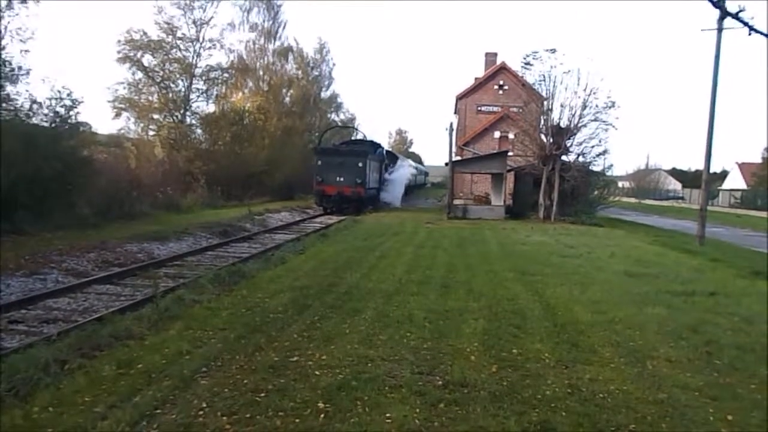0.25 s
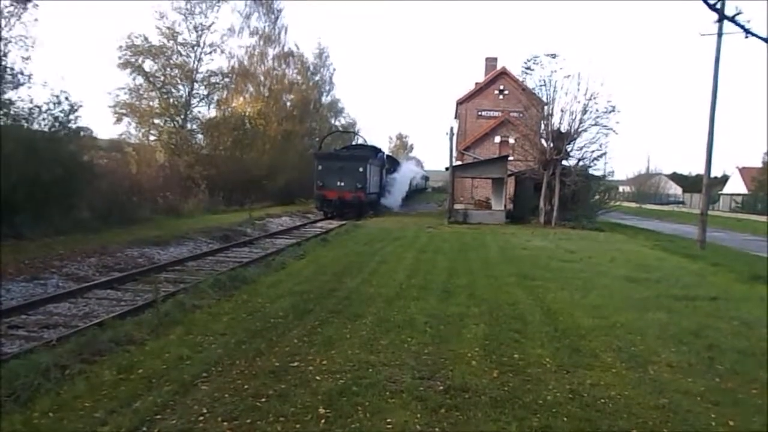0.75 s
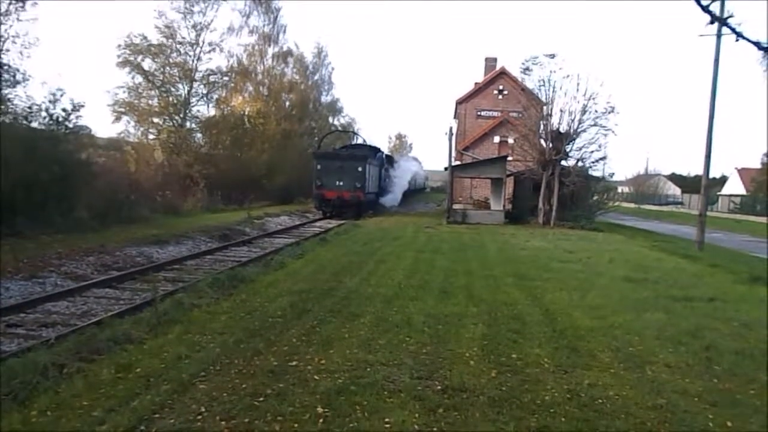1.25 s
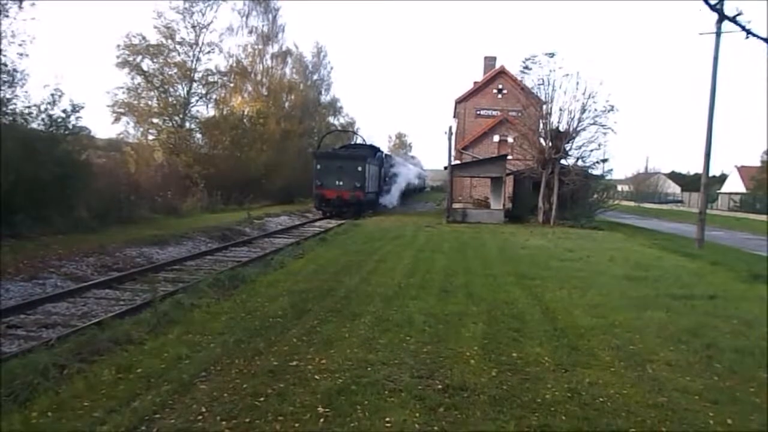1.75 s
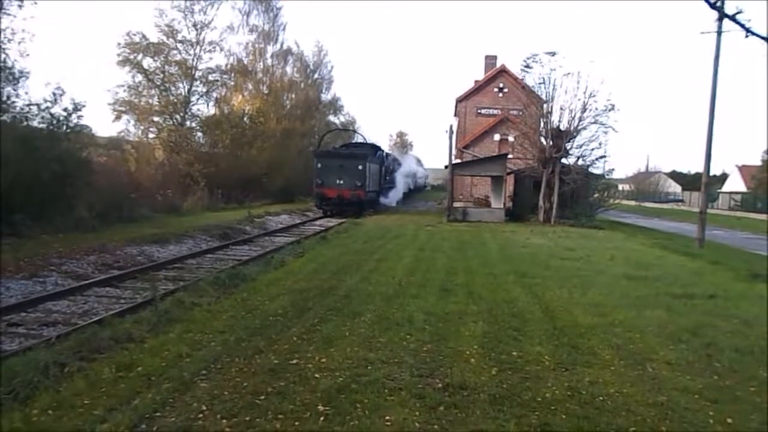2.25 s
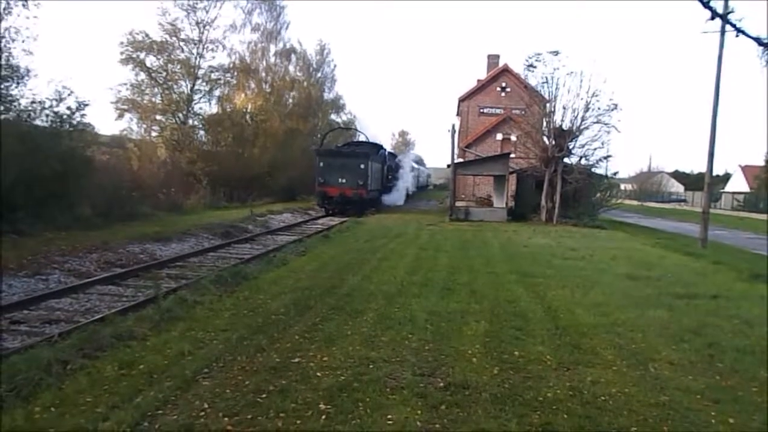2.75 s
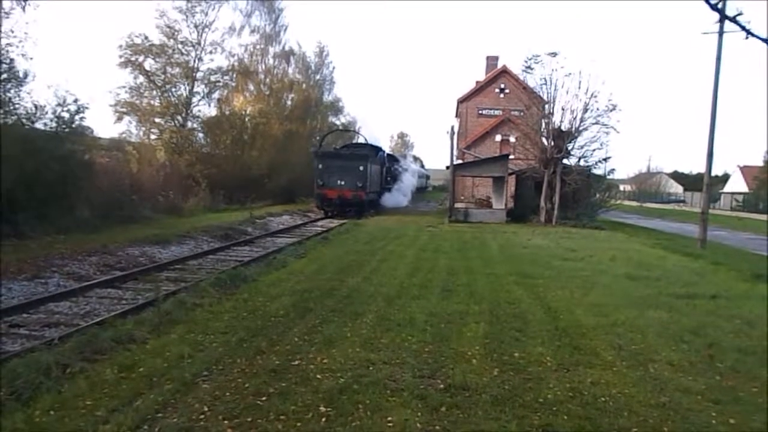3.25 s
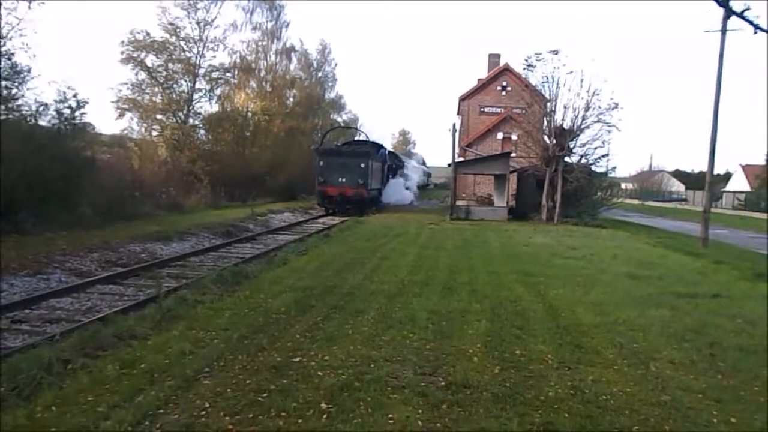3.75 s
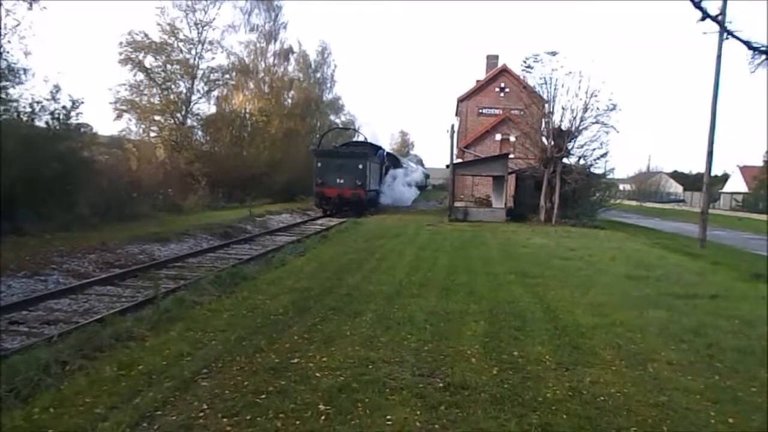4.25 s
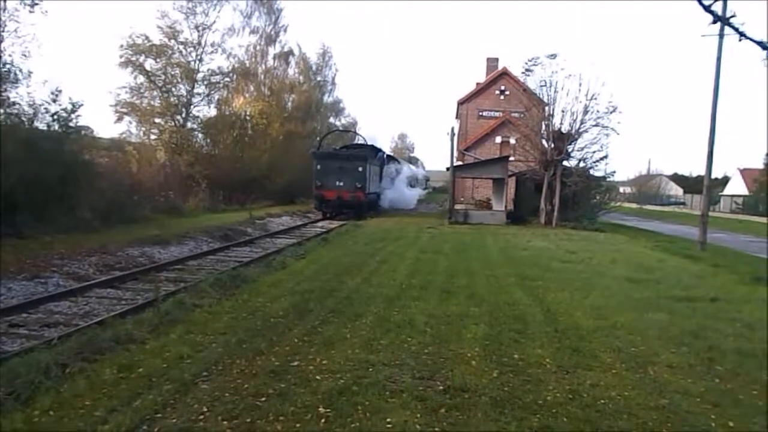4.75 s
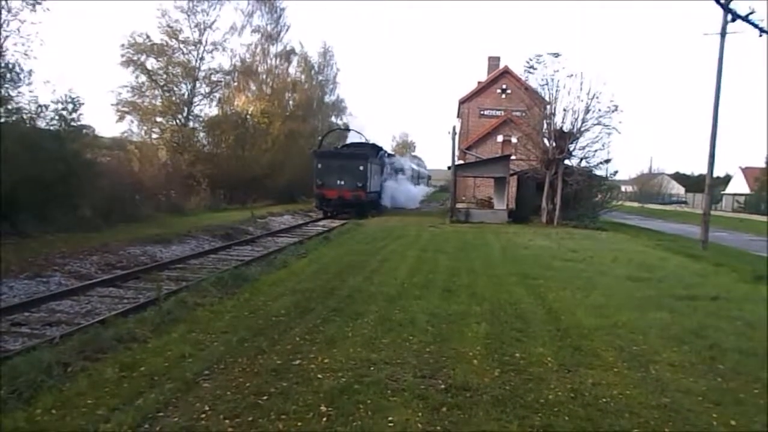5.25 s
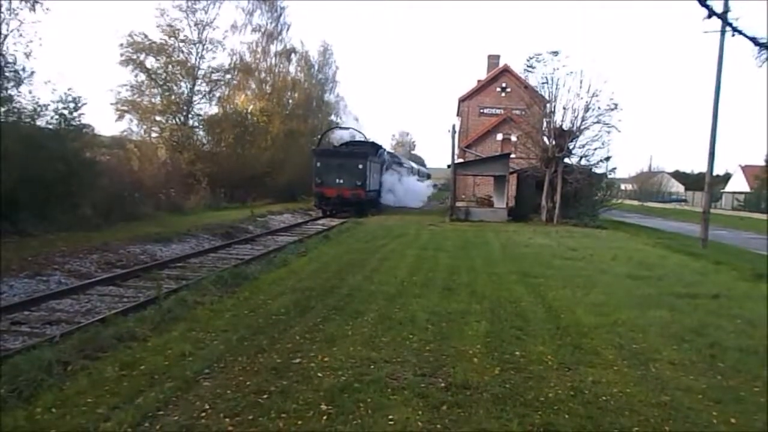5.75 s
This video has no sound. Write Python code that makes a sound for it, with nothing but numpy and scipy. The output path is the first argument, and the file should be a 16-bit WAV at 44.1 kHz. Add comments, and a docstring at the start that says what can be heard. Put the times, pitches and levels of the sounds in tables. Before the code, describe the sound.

Steam blows steadily from a distant stationary engine: patchy, fizzy noise, a smoother breathy roar and thin, fuzzy whistling tones. A few isolated soft wind bumps come early; then clusters of low flapping buffets dominate the foreground, with short lulls. The jet grows stronger through the middle and stays fairly full. A single handheld-type microphone in open air, identical on both sides, slightly dull on top, overloads in the strongest gust near five seconds.

```python
"""A steam locomotive stands across a lawn and blows off steam while wind strikes the single microphone.
From the start: a bright jet hiss (patchy coloured noise at the level of the steam pressure), a duller roar that
swings less, and fuzzy whistles from valves and pipes (noise in narrow resonances). The jet swells until about 4 s.
Gusts, faint at first and dense from about 2 s, bring low turbulence and short thumps; the strongest comes near 5 s.
A limiter ducks the level just after high peaks, and a treble filter leaves narrow gaps."""
import sys
import numpy as np
from scipy import signal
from scipy.fft import rfft, irfft, next_fast_len
from scipy.io import wavfile
from scipy.ndimage import uniform_filter1d, minimum_filter1d, map_coordinates

SR = 44100
rng = np.random.default_rng(int(sys.argv[2]) if len(sys.argv) > 2 else 0)


def output_pcm(signal):
    """Save a mono or channel-first signal as 16-bit PCM at the path in sys.argv[1].

    Samples are clipped to [-1, 1] before scaling.
    """
    pcm = np.clip(np.atleast_2d(signal).T, -1, 1) * 32767
    wavfile.write(sys.argv[1], SR, np.round(pcm).astype(np.int16))


N = 265217


def amp(db):
    """Gain of a level in dB."""
    return 10 ** (np.asarray(db) / 20)


def unit(x):
    """x at rms 1."""
    return x / np.sqrt(np.mean(x ** 2) + 1e-20)


def along(points, hz):
    """(frequency [Hz], value) points interpolated on a log frequency axis."""
    point_hz, values = np.transpose(points)
    return np.interp(np.log(hz + 1), np.log(point_hz + 1), values)


def wobble(knots_per_s):
    """Smooth random curve: a spline through normal random knots."""
    knots = rng.standard_normal(int(N * knots_per_s / SR) + 4)
    return map_coordinates(knots, [np.arange(N) * knots_per_s / SR])


def filtered(x, response):
    """x times a response of frequency in Hz, zero-padded against wrap-around."""
    size = next_fast_len(N + SR // 2)
    spectrum = rfft(x, size) * response(np.fft.rfftfreq(size, 1 / SR))
    return irfft(spectrum, size)[..., :N]


def rush(spectrum, patchy_db):
    """Turbulent flow: coloured noise of rms 1 with patches of random gain in time and frequency."""
    z = signal.stft(rng.standard_normal(N + 512), nperseg=512)[2]
    field = uniform_filter1d(rng.standard_normal(z.shape), size=7, axis=0)  # bins
    field = uniform_filter1d(field, size=8, axis=1)  # frames
    noise = signal.istft(z * amp(patchy_db * unit(field)), nperseg=512)[1][:N]
    return unit(filtered(noise, lambda hz: amp(along(spectrum, hz))))


def steam():
    """Escaping steam: the jet follows the pressure, flutters, swells and dips; the roar is smoother."""
    # jet colour: (frequency [Hz], relative level [dB per Hz])
    jet_spectrum = [(600, -68), (1500, -19.5), (2500, -6.5), (3600, -7), (4500, -3), (5200, -1),
                    (6200, -4.5), (7700, -11), (9300, -12.5), (10600, -9.5), (11300, -26)]
    # roar colour: (frequency [Hz], relative level [dB per Hz])
    roar_spectrum = [(40, 8), (120, -1.5), (300, -11), (520, 2), (700, -3), (900, -3), (1200, -2.5),
                     (1700, -0.5), (2600, -4), (4500, -3), (9000, -82)]
    # steam pressure, heard as the jet's level: (time [s], level [dB])
    pressure = [(0, -31), (.4, -31), (.87, -33), (1.3, -32), (1.8, -27), (2.3, -30), (3.0, -25.5),
                (3.3, -26.5), (3.6, -24), (3.9, -24), (4.2, -23), (4.55, -25.5), (4.83, -24), (5.1, -26.5),
                (5.4, -25), (5.65, -26.5), (5.76, -24.5), (6.01, -27.5)]
    # brief swells and one dip of the jet: (centre time [s], level change [dB])
    swells_and_dips = [(1.5, 1), (1.77, -3.5), (3.7, 2), (4.23, 1), (5.23, 3)]
    onset_s, release_s = 0.039, 0.022
    roar_mean_db, roar_follows = -36.5, 0.42  # dB of roar per dB of jet

    t = np.arange(N) / SR
    jet_db = np.interp(t, *np.transpose(pressure))
    change_db = np.zeros(N)
    for centre_s, peak_change_db in swells_and_dips:
        width_s = np.where(t < centre_s, onset_s, release_s)
        change_db += peak_change_db * np.exp(-((t - centre_s) / width_s) ** 2)
    flutter_db = 0.15 * wobble(7) + 0.96 * wobble(30)
    jet = amp(jet_db + change_db + flutter_db) * rush(jet_spectrum, patchy_db=1.34)

    roar_db = roar_mean_db + roar_follows * (jet_db - jet_db.mean())
    roar = rush(roar_spectrum, patchy_db=1.1) * amp(0.4 * wobble(8))
    return jet + amp(roar_db) * roar


def whistles():
    """Steam past valve edges: noise in narrow resonances that come and go."""
    # resonances: (centre [Hz], width at half amplitude [Hz], start level [dB], end level [dB])
    resonances = [(1254, 7, -57, -52), (1520, 90, -51, -60), (2570, 110, -44, -56), (3184, 20, -49, -53),
                  (4500, 150, -48, -54)]
    out = np.zeros(N)
    for centre_hz, width_hz, start_db, end_db in resonances:
        tone = filtered(rng.standard_normal(N), lambda f: 1 / (1 + (2 * (f - centre_hz) / width_hz) ** 2))
        level_db = np.linspace(start_db, end_db, N) + 2.13 * wobble(3.38)
        out += amp(level_db) * unit(tone)
    return out


def gusts():
    """Wind strength in dB: every gust rises, holds and falls away into a wavering calm."""
    # gusts on the microphone: (start of hold [s], hold [s], buffeting level [dB])
    gust_list = [(0.117, .08, -44), (0.305, 0.042, -33), (1.111, .07, -44), (1.3, .08, -44.5),
                 (1.415, 0.035, -30), (2.17, 0.11, -25), (2.295, 0.04, -24.5), (2.42, 0.053, -24),
                 (2.486, .22, -25.5), (2.732, .11, -24.5), (2.886, 0.051, -26), (2.96, .02, -34),
                 (3.082, 0.072, -23.5), (3.21, 0.013, -31.5), (3.494, 0.077, -33.5), (3.58, .015, -36),
                 (3.64, .015, -33.5), (3.778, .03, -30), (3.94, .07, -24.5), (4.023, 0.086, -22),
                 (4.144, 0.095, -27.5), (4.326, 0.065, -24), (4.45, .08, -40.5), (4.745, .02, -37.5),
                 (4.788, 0.012, -27.5), (4.838, 0.103, -24), (4.966, 0.073, -17), (5.078, 0.029, -21.5),
                 (5.128, .03, -30), (5.185, .04, -25), (5.286, 0.023, -27), (5.348, 0.12, -36.5),
                 (5.511, 0.039, -23.5), (5.617, 0.14, -43.5), (5.912, 0.089, -39)]
    rise_db_per_s, fall_db_per_s, calm_db = 950, 480, -52.5
    t = np.arange(N) / SR
    shapes = []
    for start_s, hold_s, level_db in gust_list:
        rise_db = rise_db_per_s * np.clip(start_s - t, 0, None)
        fall_db = fall_db_per_s * np.clip(t - start_s - hold_s, 0, None)
        shapes.append(level_db - rise_db - fall_db)
    return np.maximum(np.max(shapes, axis=0), calm_db + 2.5 * wobble(8.2))


def eddy(hz, turns):
    """One push of air on the diaphragm: a short swing of random phase, rising faster than it falls."""
    u = np.arange(-1024, 1024) / SR * hz  # cycles from the centre
    shape = np.exp(-(u / np.where(u < 0, 0.39 * turns, 0.94 * turns)) ** 2)
    return shape * np.cos(2 * np.pi * (u + rng.random()))


def wind():
    """Lumpy low turbulence under the gusts, and single eddies on top, the harder the snappier."""
    # low turbulence colour: (frequency [Hz], relative level [dB per Hz])
    buffet_spectrum = [(20, -33), (50, 2), (100, 3.5), (185, 4), (260, -5.5), (380, -19), (560, -27.5),
                       (900, -74)]
    # colour of the smaller, brighter eddies of hard gusts: (frequency [Hz], relative level [dB per Hz])
    whip_spectrum = [(150, -32), (280, 15.5), (420, 13), (600, 1.5), (900, -17), (1400, -45)]
    # strongest eddies: (centre [s], envelope peak [dB], pitch [Hz], envelope peak of the bright snap [dB])
    thumps = [(0.342, -20.5, 165, -42), (1.432, -12, 225, -45), (1.456, -14.5, 218, -46),
              (2.1721, -5.5, 340, -19.5), (2.176, -9.5, 295, -19), (2.206, -8, 200, -33),
              (2.553, -9, 239, -43), (2.581, -7, 220, -38), (2.607, -7, 282, -27), (2.627, -10, 234, -17),
              (2.652, -12, 260, -22), (2.694, -9, 262, -13), (2.756, -12.5, 202, -22),
              (2.896, -11.5, 176, -37), (3.026, -14, 175, -43), (3.143, -7.5, 192, -27),
              (3.789, -10, 211, -28), (4.036, -5, 400, -18), (4.058, -13, 200, -27),
              (4.103, -10.5, 198, -24), (4.113, -5.5, 226, -14.5), (4.289, -13.5, 201, -43),
              (4.361, -10.5, 234, -28), (4.388, -12.5, 171, -32), (4.797, -4.5, 310, -36),
              (4.85, -9, 231, -23), (4.911, -10, 211, -34), (4.923, -9, 260, -22), (4.966, 1.5, 362, -2.5),
              (4.9711, 2.5, 320, -3.5), (4.993, 0.5, 270, -18), (5.006, -14, 239, -14),
              (5.013, -3.5, 200, -32), (5.039, -8, 332, -17), (5.048, -10, 348, -11),
              (5.077, -5, 293, -16.5), (5.217, -14, 180, -33), (5.293, -21, 210, -41),
              (5.309, -16, 187, -30), (5.507, -7.5, 249, -25), (5.526, -8.5, 268, -39),
              (5.543, -14, 230, -35)]
    small_per_s, small_over_gust_db, small_hz = 30, 8, 235
    snap_at_0_db, snap_db_per_db = -12, 1.6  # lesser eddies: snap level against eddy peak

    gust_db = gusts()
    lumps = amp(2.4 * wobble(45) + 1.6 * wobble(110))
    buffet = unit(lumps * rush(buffet_spectrum, patchy_db=1.5))
    whipped = unit(lumps * rush(whip_spectrum, patchy_db=3))
    whip_db = 0.97 * (gust_db + 21.0) - 8  # over the buffet
    out = amp(gust_db) * (buffet + amp(whip_db) * whipped)

    # lesser eddies: one at a random time in each slot
    slots = np.arange(0, N / SR - 1 / small_per_s, 1 / small_per_s)
    chance = rng.random((len(slots), 3))
    times = slots + chance[:, 0] / small_per_s
    peak_db = gust_db[(times * SR).astype(int)] + small_over_gust_db + 8 * (chance[:, 1] - 0.5)
    pitch_hz = small_hz * (1 + 0.5 * (chance[:, 2] - 0.5))
    small = np.transpose([times, peak_db, pitch_hz, snap_at_0_db + snap_db_per_db * peak_db])

    out = np.pad(out, 1024)  # room for half an eddy at each end
    for centre_s, db, hz, snap_db in [*thumps, *small]:
        push = amp(db) * eddy(hz, turns=0.63)
        push += amp(snap_db) * eddy(613, turns=0.91)
        out[round(centre_s * SR):][:2048] += push
    return out[1024:N + 1024]


def scene():
    """One microphone, the same on both channels."""
    return np.tile(steam() + whistles() + wind(), (2, 1))


def limited(x, top_db, hold_s, ease_s):
    """Limiter: a peak over the top pulls the gain down just after it, easing in and out."""
    need = np.minimum(1, amp(top_db) / (np.abs(x) + 1e-9))
    span, ramp = int(hold_s * SR) | 1, int(ease_s * SR) | 1
    # origins make both windows look back only
    held = minimum_filter1d(need, span, origin=span // 2)
    return x * uniform_filter1d(held, ramp, origin=ramp // 2)


def record(dry):
    """Bass roll-off of the microphone, limiter, rounded overload, nulls of the treble filter, band limit."""
    # treble filter nulls: (centre [Hz], half width [Hz])
    nulls = [(7000, 690), (8500, 500), (10000, 460), (11520, 600)]
    bass_hz, top_hz = 66, 11470

    def treble(f):
        """Product of the nulls, cut off at the band limit."""
        gaps = [(f - hz) / np.hypot(f - hz, half_width_hz) for hz, half_width_hz in nulls]
        return np.prod(gaps, axis=0) * (f < top_hz)

    x = filtered(dry, lambda f: (1j * f / (bass_hz + 1j * f)) ** 2)
    x = limited(x, top_db=-4.5, hold_s=0.022, ease_s=0.004)
    x = x / (1 + np.abs(x) ** 6) ** (1 / 6)
    return filtered(x, treble)


dry = scene()
out = record(dry)
output_pcm(out)
```